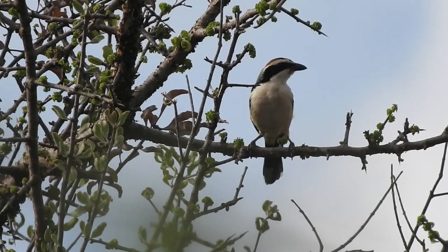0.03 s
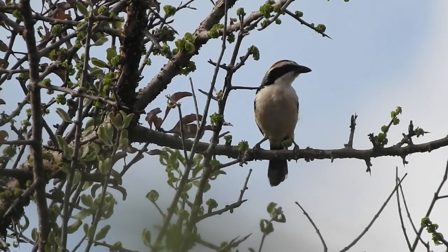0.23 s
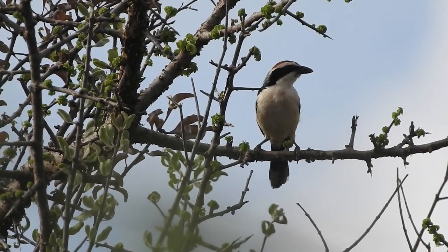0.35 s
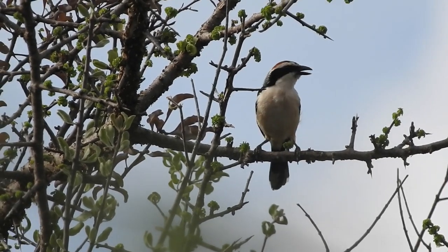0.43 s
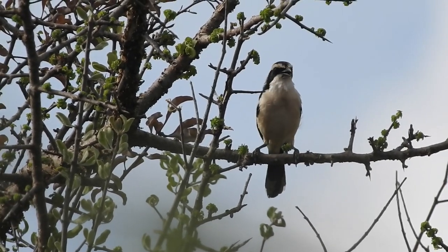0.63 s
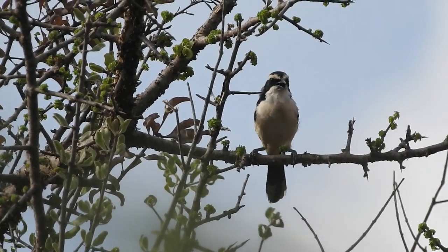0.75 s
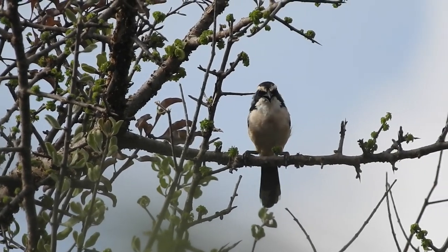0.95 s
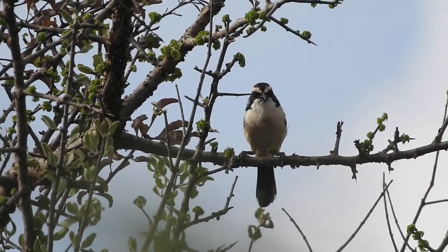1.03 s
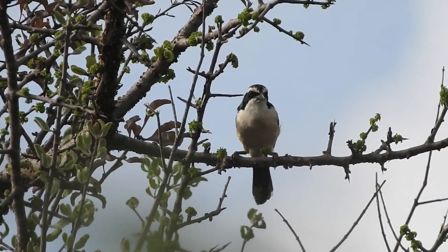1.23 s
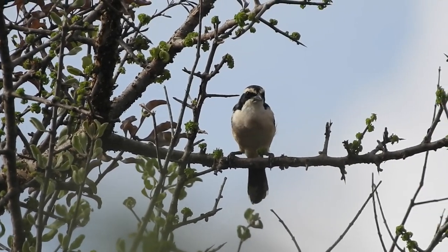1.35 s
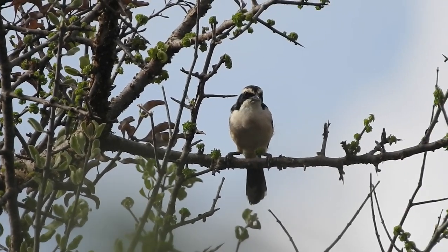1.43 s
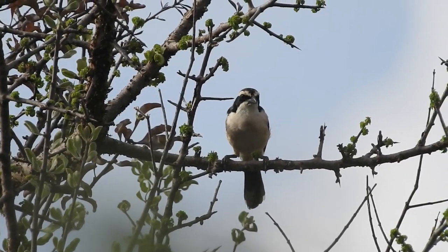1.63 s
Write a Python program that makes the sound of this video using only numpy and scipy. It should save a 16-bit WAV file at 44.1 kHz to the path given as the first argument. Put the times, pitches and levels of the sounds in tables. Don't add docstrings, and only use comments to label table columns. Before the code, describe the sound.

Bird calls outdoors: gliding whistles, then a loud throaty double purr, then fainter chirps over soft hiss

```python
import sys
import numpy as np
from scipy import signal
from scipy.io import wavfile
from scipy.ndimage import uniform_filter1d

SR = 44100
rng = np.random.default_rng(int(sys.argv[2]) if len(sys.argv) > 2 else 0)


def int16_out(signal):
    q = np.round(np.clip(np.atleast_2d(signal).T, -1, 1) * 32767)
    wavfile.write(sys.argv[1], SR, q.astype(np.int16))


def boost(x):
    u = np.asarray(x, float) / 20
    return 10 ** u


N = 74970

ROUGH_DB, STEADY_DB = 2.6, .9
FAR_BLUR, NEAR_BLUR = .4, .15
FAR_FADE_DB = -5
NEIGHBOUR_PAN_DB = 1.5


def evened(x):
    return x / np.sqrt(np.mean(x ** 2) + 1e-20)


def read(points, hz):
    f, value = np.transpose(points)
    return np.interp(np.log(hz + 1), np.log(f + 1), value)


def drift(span):
    once = uniform_filter1d(rng.standard_normal(N), span)
    return evened(uniform_filter1d(once, span))


def add(mix, start_s, sound, pan_db, left_late=0):
    part = mix[:, round(start_s * SR):][:, :len(sound)]
    pair = np.array([np.roll(sound, left_late), sound])[:, :part.shape[1]]
    part += pair * boost([[pan_db / 2], [-pan_db / 2]])


# f/Hz, likeness/0-1
LIKENESS = [(40, 0.6), (90, 0.36), (180, 0.21), (350, 0.2), (1000, 0.39), (15000, 0)]


def noise(spectrum, patchy_db):
    frames, hz = N // 256 + 5, np.fft.rfftfreq(1024, 1 / SR)
    a, b, c, d, patches = rng.standard_normal((frames, 513, 5)).T
    patches = uniform_filter1d(uniform_filter1d(patches, size=10, axis=0), size=12, axis=1)
    same = np.clip(read(LIKENESS, hz), 0, 1)[:, None]
    left = a + 1j * b
    right = same * left + np.sqrt(1 - same ** 2) * (c + 1j * d)
    level_db = read(spectrum, hz)[:, None] + patchy_db * evened(patches)
    z = np.array([left, right]) * boost(level_db)
    return evened(signal.istft(z, nperseg=1024, noverlap=768)[1][:, :N])


# f/Hz, density/dB per Hz
BREEZE_SPECTRUM = [(120, -23), (200, -4), (300, -6.5), (600, -7), (1000, -12), (2000, -15.5), (3000, -16),
                   (6000, -47)]
# t/s, level/dB
GUSTS = [(0, 0), (.15, 0), (.23, 5), (.35, -1), (.5, 0.5), (.65, -4), (.8, -2.5), (.95, -2.5), (1.08, -0.5),
         (1.18, 1), (1.7, -0.5)]


def breeze():
    gust_db = np.interp(np.arange(N) / SR, *np.transpose(GUSTS))
    return boost(-52 + gust_db) * noise(BREEZE_SPECTRUM, patchy_db=1.5)


# f/Hz, density/dB per Hz
HISS_SPECTRUM = [(900, -38), (2200, -5.5), (3500, -2), (6500, -4.5), (10000, -12.5), (15700, -21)]
# f/Hz, density/dB per Hz
RUMBLE_SPECTRUM = [(30, -45), (40, -6.5), (60, 13), (100, 0), (150, -1.5), (200, 2.5), (280, -33),
                   (400, -41)]


def hiss_and_rumble():
    hiss = boost(-57) * noise(HISS_SPECTRUM, patchy_db=0.48)
    rumble = boost(-52.5) * noise(RUMBLE_SPECTRUM, patchy_db=0.84)
    return hiss + rumble


# f/Hz, level/dB, width/Hz
HUM_TONES = [(46.1, -58.5, 5.1), (91.4, -56.5, 5.4), (135.4, -59.5, 1.5)]


def motor_hum():
    t, hum = np.arange(N) / SR, np.zeros(N)
    for hz, db, width_hz in HUM_TONES:
        level = boost(db + 0.65 * drift(round(SR / width_hz / 4)))
        phase = 2 * np.pi * hz * t + 0.66 * drift(round(SR / width_hz / 2))
        hum += np.sqrt(2) * level * np.sin(phase)
    return hum


def whistle(rows, flutter_db=STEADY_DB):
    s, hz, db = np.transpose(rows)
    t = np.arange(s[0], s[-1], 1 / SR)
    wobble = 1 + .002 * drift(span=130)[:len(t)]
    pitch_hz = uniform_filter1d(np.interp(t, s, hz), size=120) * wobble
    ends = np.clip(np.minimum(t - s[0], s[-1] - t) / .003, 0, 1)
    level = boost(np.interp(t, s, db) + flutter_db * drift(span=170)[:len(t)])
    return np.sqrt(2) * ends * level * np.sin(2 * np.pi * np.cumsum(pitch_hz) / SR)


def glide(start_s, length_s, from_hz, to_hz, db, fade_db=-11):
    at = np.array([0, .25, 1])
    pitch_hz = from_hz * (to_hz / from_hz) ** at
    level_db = db + np.array([-1, 0, fade_db])
    return whistle(np.transpose([start_s + length_s * at, pitch_hz, level_db]))


def blurred(x, share):
    return x * (np.sqrt(1 - share ** 2) + share * drift(span=60)[:len(x)])


# t/s, length/s, from f/Hz, to f/Hz, level/dB
CHATTER = [(.002, .04, 2900, 3600, -59), (.005, .015, 2700, 2600, -58), (.09, .01, 3000, 2600, -55),
           (.122, .018, 3800, 3750, -56), (.21, .015, 2450, 2400, -59), (.228, .03, 3350, 3100, -57),
           (.626, .02, 4500, 4200, -56), (.633, .01, 3500, 3350, -52), (.708, .035, 3400, 3200, -51),
           (.755, .03, 3300, 3400, -55), (1.4, .01, 3900, 4200, -60), (1.425, .024, 4800, 4750, -58),
           (1.465, .025, 4900, 5000, -62), (1.47, .065, 6300, 6150, -63), (1.482, .01, 6700, 6600, -61),
           (1.596, .01, 5300, 4000, -58), (1.618, .012, 5200, 3800, -60), (1.668, .03, 3150, 3500, -60),
           (1.03, .09, 2800, 2760, -54), (.27, .05, 3150, 3100, -56), (.43, .03, 3020, 3000, -54)]


def chatter(mix):
    for row in CHATTER:
        add(mix, row[0], blurred(glide(*row, FAR_FADE_DB), FAR_BLUR), NEIGHBOUR_PAN_DB)


PAN_DB = {"held": -6, "second": 1.5, "third": 4, "warble": 1.5, "slide": 6, "hoot": 0, "purr": 0, "link": 0}


def sing(mix, voice, rows, flutter_db=STEADY_DB, left_late=0):
    add(mix, rows[0][0], boost(5) * whistle(rows, flutter_db), PAN_DB[voice], left_late)


# t/s, f/Hz, level/dB
WARBLE = [(.045, 3450, -58), (.062, 3320, -49), (0.09, 3040, -51), (.11, 3000, -57), (0.155, 2975, -52),
          (0.172, 2880, -56), (0.207, 2540, -51), (0.222, 3150, -52), (.23, 3320, -58)]


def warble(mix):
    add(mix, WARBLE[0][0], blurred(whistle(WARBLE), FAR_BLUR), PAN_DB["warble"])


# t/s, length/s, from f/Hz, to f/Hz, level/dB
GLIDES = [(.072, .032, 3620, 3380, -50), (.148, .01, 3600, 3250, -54), (.373, .022, 3985, 3990, -49),
          (.4, .045, 3990, 3990, -44), (.47, .032, 3990, 3990, -45), (.537, .011, 1330, 1220, -40),
          (.553, .019, 3850, 2200, -36), (.568, .028, 2400, 1150, -46), (.7025, .013, 1330, 1200, -35),
          (.835, .08, 630, 625, -51), (.45, .09, 6500, 6700, -55), (.616, .012, 5000, 4850, -52),
          (.672, .03, 3700, 3400, -53), (.924, .016, 7700, 8200, -43), (1.075, .035, 5900, 7400, -49),
          (1.228, .045, 6000, 7400, -56), (1.277, .027, 3350, 4000, -52), (1.411, .013, 2900, 2500, -52),
          (1.456, .016, 7000, 6000, -56), (1.508, .009, 3750, 3400, -51), (1.51, .03, 4600, 4450, -56),
          (1.584, .018, 7200, 5800, -56),
          (1.564, 0.03, 3830, 3850, -57),
    (1.581, 0.045, 2674, 2650, -58.5),
    (1.595, 0.011, 3000, 2110, -51),
    (1.608, 0.079, 3770, 2650, -55),
    (1.151, 0.055, 6020, 6650, -64),
    (1.255, 0.016, 3300, 3600, -75),
]


def glides(mix):
    for row in GLIDES:
        add(mix, row[0], blurred(glide(*row), NEAR_BLUR), NEIGHBOUR_PAN_DB)


# t/s, f/Hz, level/dB
HELD = [(.165, 3955, -64), (.176, 3953, -51), (.2, 3930, -49), (.22, 3965, -41), (.29, 3995, -38.5),
        (.303, 3820, -44), (.316, 3930, -53), (.35, 3900, -58)]


def held_whistle(mix):
    sing(mix, "held", HELD, left_late=2)


# t/s, f/Hz, level/dB
SECOND = [(.37, 3724, -66), (.386, 3540, -51), (.395, 3567, -34), (.422, 3477, -31), (.44, 3452, -38.5),
          (.474, 3455, -34), (.483, 3320, -33.5), (.489, 2460, -54)]


def second_whistle(mix):
    sing(mix, "second", SECOND)


# t/s, f/Hz, level/dB
THIRD = [(.505, 2898, -49.5), (.521, 3157, -39), (.581, 3478, -38.5), (.601, 3385, -42), (.606, 3550, -36)]


def third_whistle(mix):
    sing(mix, "third", THIRD, ROUGH_DB)


# t/s, f/Hz, level/dB
HOOT = [(.594, 810, -67), (.603, 827, -45.5), (.642, 870, -54.5), (.65, 837, -77), (.69, 870, -72)]


def hoot(mix):
    sing(mix, "hoot", HOOT)


# t/s, length/s, f/Hz, level/dB
STEPS = [
    (0.605, 0.02, 3210, -31),
    (0.624, .021, 2907, -40.5),
    (0.645, .010, 2880, -44),
    (.658, 0.011, 2840, -60),
]


def stepped_ending(mix):
    for start_s, length_s, hz, db in STEPS:
        landed_s = start_s + min(.006, length_s / 2)
        rows = [(start_s, hz + 500, db - 7), (landed_s, hz, db), (start_s + length_s, hz, db - 4)]
        add(mix, start_s, whistle(rows, ROUGH_DB), PAN_DB["third"])


def purr(rows, second_db, sag_hz, width_s, pitch_spread):
    s, rate_hz, hz, db = np.transpose(rows)
    t = np.arange(s[0], s[-1], 1 / SR)
    throb_count = np.floor(np.cumsum(np.interp(t, s, rate_hz)) / SR)
    starts = np.flatnonzero(np.diff(throb_count, prepend=-1))
    u = np.arange(900) / SR - .003
    out, luck = np.zeros(len(t) + 900), rng.standard_normal((40, 4))
    band = signal.butter(2, [5200, 9200], "band", fs=SR, output="sos")
    rattle = boost(-33) * evened(signal.sosfilt(band, rng.standard_normal(N)))
    sag = -sag_hz * np.tanh(u / .0013)
    second_beat = np.exp(-.5 * ((u - .0036) / .0017) ** 2)
    for i, (strong, second, wide, off) in zip(starts, luck):
        pitch_hz = np.interp(t[i], s, hz)
        burst_hz = pitch_hz * (1 + pitch_spread * off) + sag
        tone = np.sqrt(2) * np.sin(2 * np.pi * np.cumsum(burst_hz) / SR)
        shape = np.exp(-.5 * (u / width_s / boost(wide) * pitch_hz / 1500) ** 2)
        shape += boost(second_db + 2 * second) * second_beat
        level = boost(np.interp(t[i], s, db) + 5 + 1.1 * strong)
        out[i:i + 900] += level * shape * (tone + rattle[i:i + 900])
    return out


# t/s, throb rate/Hz, f/Hz, level/dB
LOW_PURR = [(.7226, 90, 925, -41), (.745, 96, 910, -35), (.76, 98, 890, -40), (.79, 94, 970, -38.5),
            (.82, 94, 1050, -36), (.842, 100, 1070, -38.5), (.856, 100, 1130, -54)]
# t/s, length/s, from f/Hz, to f/Hz, level/dB
PURR_STRANDS = [
    (.755, .03, 838, 832, -42),
    (.81, .042, 1120, 1135, -42),
    (.8, .045, 935, 940, -47),
    (.738, .02, 1310, 1300, -56),
    (.808, .05, 1520, 1500, -58),
    (.878, .01, 1300, 1750, -48),
]


def low_purr(mix):
    sound = purr(LOW_PURR, second_db=-12, sag_hz=15, width_s=.00105, pitch_spread=.02)
    add(mix, LOW_PURR[0][0], sound, PAN_DB["purr"])
    for row in PURR_STRANDS:
        add(mix, row[0], blurred(glide(*row, FAR_FADE_DB), NEAR_BLUR), PAN_DB["purr"])


# t/s, f/Hz, level/dB
LINK = [(.855, 1140, -56), (.862, 1125, -42), (.88, 1130, -48), (.888, 1300, -44)]


def slide_link(mix):
    sing(mix, "link", LINK)


# t/s, throb rate/Hz, f/Hz, level/dB
HIGH_PURR = [(.888, 72.3, 1474, -23), (.903, 100, 1507, -18), (0.935, 101.5, 1554, -23.5),
             (.955, 116.8, 1505, -22.5), (.975, 114, 1530, -22.5), (0.989, 99.16, 1524, -22.5),
             (1.041, 106.1, 1483, -26), (1.086, 99.3, 1530, -28.5), (1.12, 94.7, 1526, -37)]


def high_purr(mix):
    sound = purr(HIGH_PURR, second_db=-6, sag_hz=60, width_s=.0013, pitch_spread=0)
    add(mix, HIGH_PURR[0][0], sound, PAN_DB["purr"])


# t/s, f/Hz, level/dB
SLIDE = [(.912, 1602, -36), (.932, 1711, -35), (.948, 1957, -27.5), (.96, 2147, -38.5), (.974, 2436, -26),
         (.994, 2822, -41), (1.04, 2774, -57.5)]


def rising_slide(mix):
    sing(mix, "slide", SLIDE, ROUGH_DB)


# t from top/s, f/Hz, level/dB
ARCH = [(-.036, 3840, 3.5), (-.028, 4300, -5.5), (-.014, 4900, -0.5), (0, 5226, -4), (0.013, 4750, -2.5),
        (0.024, 4360, 2.5), (.036, 4240, -9), (.04, 4130, -20)]
# top t/s, level/dB, left-right/dB
ARCH_CALLS = [
    (0.996, -44, 6.5),
    (1.341, -49, 7.5),
    (1.673, -54, 6),
]


def arch_calls(mix):
    for top_s, db, pan_db in ARCH_CALLS:
        add(mix, top_s + ARCH[0][0], boost(db) * whistle(ARCH, ROUGH_DB), pan_db)


# t/s, f/Hz, level/dB
CHIRP = [(1.497, 3690, -39), (1.502, 3610, -40), (1.510, 2860, -37.5), (1.517, 2130, -43.5),
         (1.524, 1750, -56), (1.533, 1360, -69)]


def falling_chirp(mix):
    add(mix, CHIRP[0][0], whistle(CHIRP), NEIGHBOUR_PAN_DB)


def scrub_echo(x):
    size, gap, smear = SR // 2, 40, .9
    taps, t = np.zeros((2, size)), np.arange(size) / SR
    at = np.arange(0, size - gap, gap) + rng.integers(0, gap, (2, (size - 1) // gap))
    np.put_along_axis(taps, at, rng.choice([-1., 1.], at.shape), 1)
    tail = taps * boost(-60 * t / 0.55) * (t > 0.0062)
    stirred = x.mean(0) * (np.sqrt(1 - smear ** 2) + smear * drift(span=75))
    return signal.fftconvolve(stirred[None], tail / np.linalg.norm(tail[0]), axes=1)[:, :N]


def scene():
    shrike, birds, slide = np.zeros((3, 2, N))
    for call in (chatter, warble, glides, held_whistle, second_whistle, third_whistle, hoot,
                 stepped_ending, slide_link, arch_calls, falling_chirp):
        call(birds)
    low_purr(shrike)
    high_purr(shrike)
    rising_slide(slide)
    echo = scrub_echo(boost(-15) * (birds + boost(5.5) * slide) + boost(-20.5) * shrike)
    return shrike + birds + slide + echo + breeze()


def top_cut(x):
    return signal.sosfilt(signal.butter(12, 16110, fs=SR, output="sos"), x)


def record(dry):
    power_db = 10 * np.log10(abs(uniform_filter1d((dry ** 2).mean(0), size=600)) + 1e-12)
    cut_db = np.clip(0.44 * (power_db + 50), 0, 9.5)
    recovery_db = np.arange(N) * 253 / SR
    cut_db = np.maximum(np.maximum.accumulate(cut_db + recovery_db) - recovery_db, 0)
    x = dry / boost(uniform_filter1d(cut_db, size=300))
    x = x + hiss_and_rumble() + motor_hum()
    low_pass = signal.firwin(511, 15650, window=("kaiser", 9), fs=SR)
    x = signal.oaconvolve(x, low_pass[None], "same")
    x = signal.sosfilt(signal.butter(6, 37, "high", fs=SR, output="sos"), x)
    return top_cut(x)


dry = scene()
out = record(dry)
int16_out(out)
```